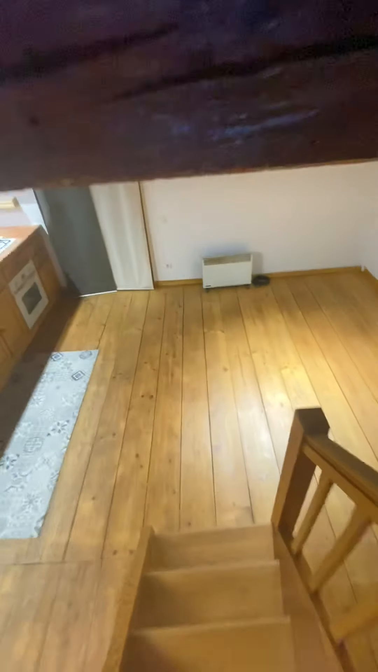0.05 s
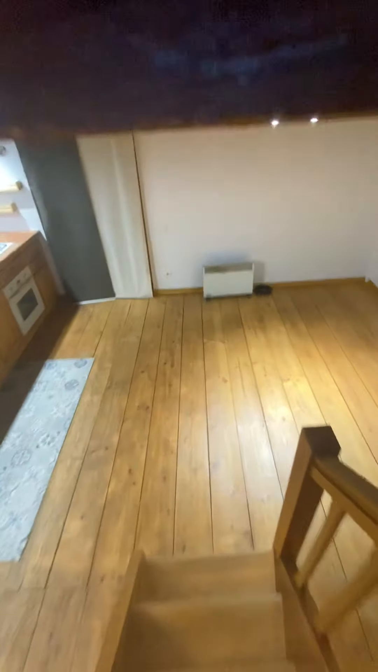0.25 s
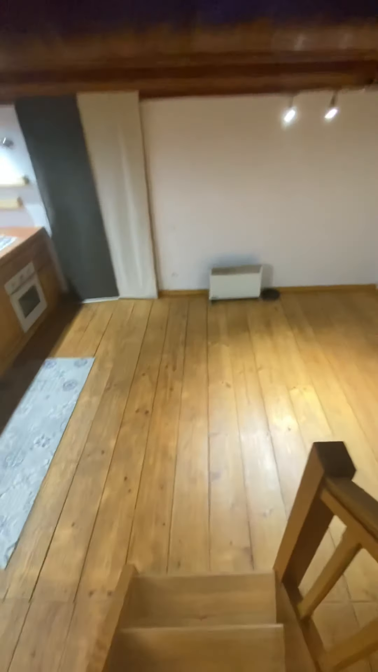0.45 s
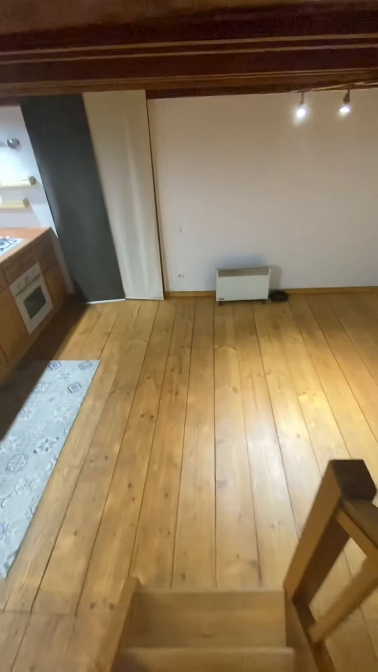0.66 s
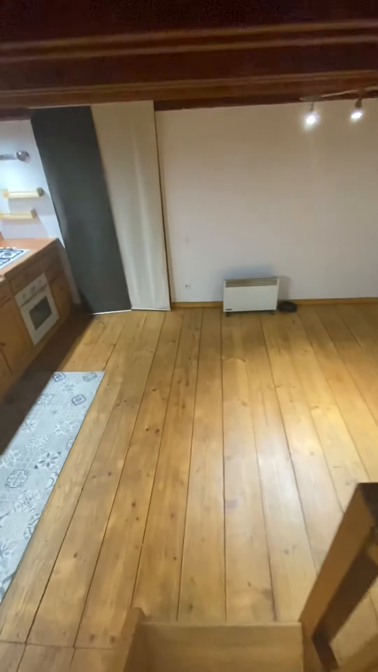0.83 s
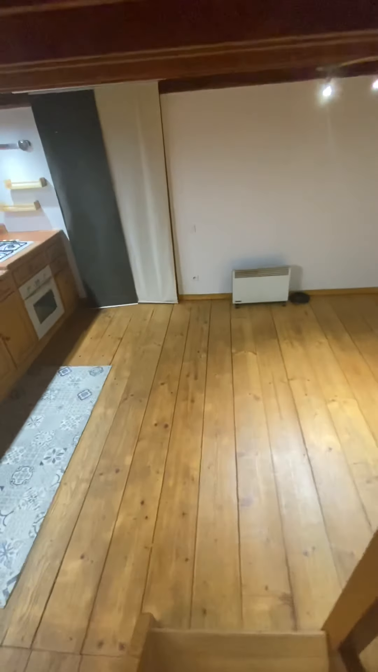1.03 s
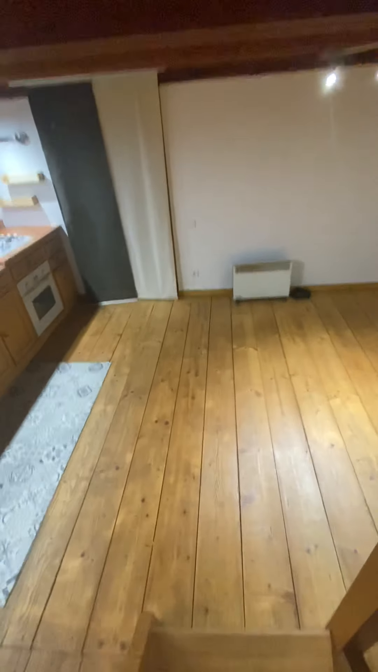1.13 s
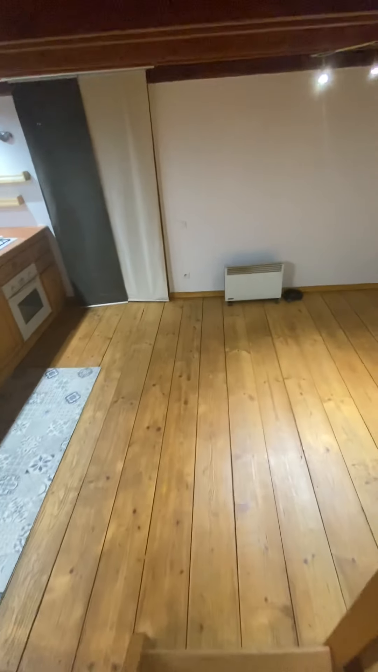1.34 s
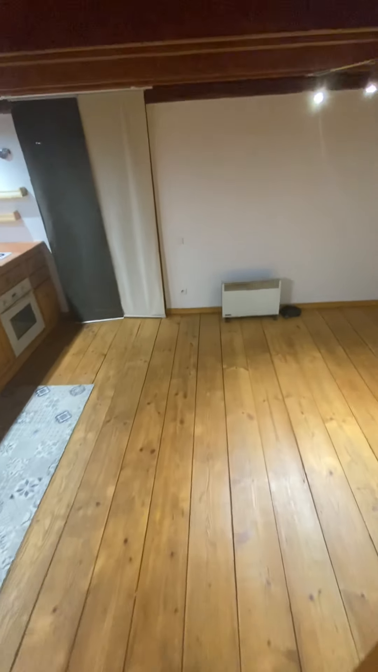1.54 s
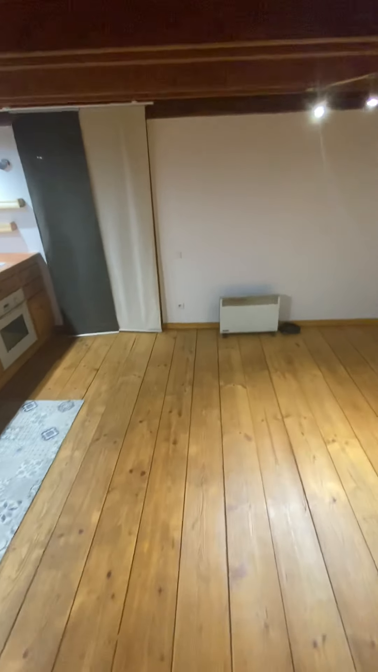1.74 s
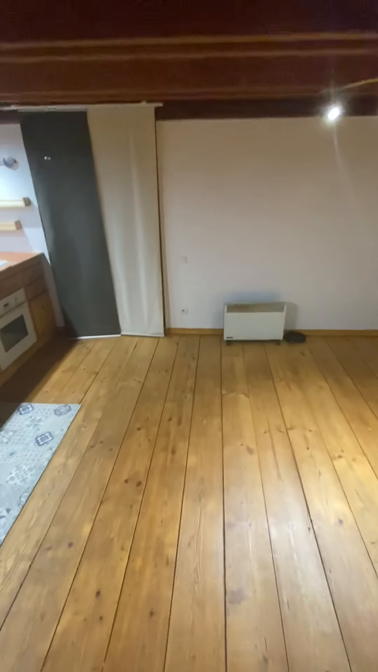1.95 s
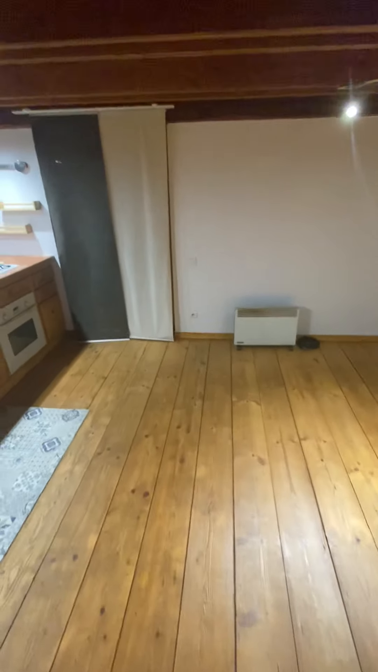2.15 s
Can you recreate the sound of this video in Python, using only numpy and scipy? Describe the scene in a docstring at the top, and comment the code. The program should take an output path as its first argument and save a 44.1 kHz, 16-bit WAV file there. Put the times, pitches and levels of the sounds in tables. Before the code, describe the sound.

Soft-soled footsteps come down a wooden staircase. A deep, hollow thud sounds at 0.2 seconds, with faint contacts and scuffs after it, then a fuller, knockier thud at 0.87 with a slight creak-like flex. At 1.63 a firm thump lands on the floorboards, followed by a faint settling touch. Clothes rustle lightly between steps; the bare room rings for under a second over quiet low hum.

```python
"""Soft footfalls come down the last two treads of a wooden staircase and onto the floorboards of a bare room.
Each sets the wood ringing: a few strong sine modes over a dense knock of noise bands that dies in the room.
The sole scuffs in short noise bursts, and the structure flexes in brief low sine swings under the weight.
Clothes rustle as flickering noise that swells with each stride; the room hums faintly as steady noise.
A stereo pair hears it all, slightly earlier on the right."""
import sys
import numpy as np
from scipy import signal
from scipy.fft import rfft, irfft, next_fast_len
from scipy.io import wavfile

SR = 44100
rng = np.random.default_rng(int(sys.argv[2]) if len(sys.argv) > 2 else 0)


def materialize(psi):
    """Save the field psi as 16-bit PCM at rate SR to the path in sys.argv[1].

    A 1-D psi becomes a single channel; in a 2-D psi each row is a channel.
    """
    bounded = np.clip(np.atleast_2d(psi).T, -1, 1)
    quanta = np.round(bounded * 32767).astype(np.int16)
    wavfile.write(sys.argv[1], SR, quanta)


N = 97020
T = np.arange(N) / SR
BAND_EDGES_HZ = 25 * 2 ** (np.arange(29) / 3)   # third octaves
CENTRES_HZ = np.sqrt(BAND_EDGES_HZ[1:] * BAND_EDGES_HZ[:-1])

# room hum spectrum: pitch_hz, relative level per hertz [dB]
HUM_SPECTRUM = [(25, -15), (45, 0), (68, -20), (98, 12.5), (140, -32), (200, -38), (500, -28.5),
                (2000, -31), (6000, -63)]
# time the room takes to die away: pitch_hz, t60_s
ROOM_T60 = [(60, 1), (125, 0.71), (250, 0.73), (550, 0.67), (800, 0.77), (3000, 1)]
# correlation of the left and right noise: pitch_hz, likeness [-1 opposite to 1 identical]
STEREO_LIKENESS = [(150, 0.97), (300, 0.91), (550, -0.32), (2000, 0.4), (5000, 0.39)]
# swells of the clothes: time_s, relative level_db
RUSTLE_SWELLS = [(0.0, -64), (0.26, -58.5), (0.54, -66.5), (0.8, -61.5), (0.87, -57.5), (1.0, -58.5),
                 (1.18, -67), (1.59, -59), (1.75, -58.5), (1.8, -65), (1.96, -64), (2.02, -69),
                 (2.2, -72.5)]
# cloth spectrum: pitch_hz, relative level per hertz [dB]
RUSTLE_SPECTRUM = [(500, -6), (1200, -15.5), (2300, -2.5), (3300, -5.5), (4400, -1), (5800, -1),
                   (6800, -4.5), (11300, -9.5), (13000, -10.5), (15500, -20.5)]
# wood flexing as the weight settles: start_s, level_db, pitch_hz, length_s
FLEXES = [(0.243, -51, 127, 0.025), (0.435, -48.5, 114, 0.074), (0.671, -45, 93.4, 0.14),
          (.867, -30.5, 131.5, 0.035), (0.924, -38.5, 48, 0.081), (0.926, -45, 84.8, 0.19),
          (1.811, -36.5, 96, 0.055)]
# sole touching and sliding on the wood: start_s, level_db, centre_hz, rise_s, t60_s
SCUFFS = [(0.201, -41, 2340, 0.001, 0.027), (0.201, -29, 480, 0.0034, 0.082),
          (.375, -43.5, 440, 0.0092, 0.13), (0.424, -44.5, 432, .015, 0.11),
          (0.668, -43, 550, 0.0031, 0.11), (0.668, -55.5, 2100, 0.0013, 0.11),
          (0.865, -45, 2320, 0.0018, 0.16), (.874, -44.5, 2700, .002, 0.069), (.872, -46, 1600, 0.016, .4),
          (1.539, -58, 390, 0.027, 1), (2.133, -61.5, 408, 0.0075, 0.76)]
# footfalls: start_s, relative ring_db, relative knock_db, rise_s, surface [name]
FOOTFALLS = [(.203, -22.5, -22.5, 0.0013, "upper"), (0.371, -64, -47.5, 0.0028, "upper"),
             (0.669, -49.5, -37.5, 0.005, "upper"), (.867, -28.5, -20, 0.0088, "lower"),
             (1.626, -24.5, -20.5, 0.0049, "floor"), (1.830, -54, -45.5, 0.008, "floor")]
# strong modes of each surface, by name: pitch_hz, relative level_db, t60_s
SURFACE_MODES = { "upper": [(123.2, 0, 0.58), (164.6, -6, 0.52), (243, -12.5, 0.395), (415.5, -13, 0.4),
                 (508, -4.5, 0.12), (648, -10.5, 0.32), (940, -15, 0.23), (1037, -25.5, 0.41)],
                 "lower": [(128, 4, 0.073), (202, -6.5, 0.49), (281, -1.5, 0.26), (354, -13.5, 0.77),
                 (447, -2, 0.54), (602, -3.5, 0.4), (652, -9, 0.43), (770, -9, 0.77), (838, -14.5, 0.57),
                 (1060, -8, 0.44), (1210, -14, 0.73), (1630, -23, 0.32)], "floor": [(107.2, -9, 0.65),
                 (154, -14.5, 0.93), (231.5, 6.5, 0.082), (552, -4, 0.38), (581.4, 10, 0.083),
                 (647, -14.5, 0.86), (665, -10, 0.39), (731, -4, 0.37), (767, -8.5, 0.48), (845, -3.5, 0.1),
                 (1052, -11, 0.42), (1187, -11, 0.45), (1320, -21, 0.37)]}
# dense knock of each surface, by name: pitch_hz, relative level per hertz [dB]
KNOCK_SPECTRA = { "upper": [(30, -15), (70, -4.5), (125, 3), (240, -11), (520, -8.5), (750, -22),
                 (1000, -20), (1250, -32), (2000, -31.5), (2800, -33), (4000, -57)], "lower": [(30, -25),
                 (70, -3.5), (125, 2), (240, 1.5), (430, 2.5), (530, -11.5), (800, 4.5), (950, -30),
                 (1150, -14.5), (1400, -24), (2000, -23.5), (2800, -28.5), (4000, -59)],
                 "floor": [(30, -25), (70, -10.5), (125, -1.5), (240, -8), (450, -6.5), (600, -1.5),
                 (820, -14), (1000, -16.5), (1300, -22), (1900, -32), (2800, -32.5), (4000, -61)]}

HUM_DB = -58.5
RUSTLE_OFFSET_DB, RUSTLE_FLICKER_DB, FLICKER_PER_S = 3.5, 1.31, 55
SCUFF_DB_PER_OCTAVE2 = 49   # how fast a scuff falls away from its centre
RIPPLE_DB, RIPPLE_SPACING_HZ = 2.5, 14   # close resonances of the wood
LINGER_DB, LINGER_T60_S = -53, 1   # the stairs still ring from the step before
MODE_RISE_S = 0.012
MODE_SPREAD_RAD_PER_KHZ = 0.42   # mean phase gap between left and right
BEAT_CYCLES, BEAT_DEPTH_PER_KHZ = 20, .7   # close neighbours beat against a mode, more in the treble
EARLY_DB, EARLY_T60_S = 4, 0.045   # near part of the knock, relative to the room's tail
BASS_RISE_CYCLES = 1.9   # low notes take longer to build
TAIL_RISE_S = 0.032   # the room answers a little later
TAIL_FLICKER_DB, TAIL_FLICKER_PER_S = 2, 60   # the knock's tail flickers unevenly as it dies
LEFT_LAG_S, PAN_DB = 0.0001933, 0.5   # left later; left raised and right lowered by PAN_DB
LOW_CUT_HZ, CUTOFF_HZ = 30, 15900


def from_db(db):
    """Decibels to gain."""
    return 10 ** (np.asarray(db) / 20)


def at_hz(points, hz):
    """Read a table on a log-frequency axis."""
    table_hz, values = np.transpose(points)
    return np.interp(np.log(hz), np.log(table_hz), values)


def decay(t, t60):
    """Exponential fall, 60 dB in t60."""
    return np.exp(-np.log(1000) * t / t60)


def rise(t, length):
    """Smooth onset."""
    return np.sin(np.pi / 2 * np.clip(t / length, 0, 1)) ** 2


def wander(t, per_s):
    """Random curve with a new value per_s times a second."""
    knots = np.arange(0, N / SR + 1, 1 / per_s)
    return np.interp(t, knots, rng.standard_normal(len(knots)))


def noise_bands(white):
    """Third-octave stereo noise, rms 1 each: left and right alike in the bass, less so or opposed above."""
    bands = []
    for k, hz in enumerate(CENTRES_HZ):
        band_pass = signal.butter(2, BAND_EDGES_HZ[k:k + 2], "band", fs=SR, output="sos")
        # neighbouring bands use separate noise
        mid, side = signal.sosfilt(band_pass, white[k % 2])[:, -N:]
        alike = np.clip(at_hz(STEREO_LIKENESS, hz), -.99, .99)
        band = np.sqrt(1 + alike) * mid + np.sqrt(1 - alike) * side * [[1], [-1]]
        bands.append(band / band.std())
    return np.array(bands)


def band_gains(spectrum):
    """Gain of each band for a spectrum per Hz; total power 1."""
    gains = from_db(at_hz(spectrum, CENTRES_HZ)) * np.sqrt(CENTRES_HZ)
    return gains / np.linalg.norm(gains)


def coloured(spectrum, bands):
    """Mix the bands to a spectrum."""
    return np.tensordot(band_gains(spectrum), bands, 1)


def resonant(white):
    """Uneven peaks and dips in the noise spectrum, as from many close resonances."""
    hz = np.fft.rfftfreq(white.shape[-1], 1 / SR)
    knots = np.arange(0, SR / 2, RIPPLE_SPACING_HZ)
    ripple = np.interp(hz, knots, rng.standard_normal(len(knots)))
    depth_db = RIPPLE_DB * np.clip(ripple, -2, 2)
    return irfft(rfft(white) * from_db(depth_db), white.shape[-1])


def room_hum(bands):
    """The room's faint steady noise, strongest in the bass."""
    return from_db(HUM_DB) * coloured(HUM_SPECTRUM, bands)


def clothes(bands):
    """Cloth slides on cloth, swelling with each stride, with a fine uneven grain."""
    grain_db = RUSTLE_FLICKER_DB * wander(T, FLICKER_PER_S)
    swell_db = np.interp(T, *np.transpose(RUSTLE_SWELLS))
    return from_db(RUSTLE_OFFSET_DB + swell_db + grain_db) * coloured(RUSTLE_SPECTRUM, bands)


def flexing():
    """Brief low swings of the structure under the walker's weight, alike on both sides."""
    out = np.zeros(N)
    for start_s, level_db, hz, length_s in FLEXES:
        t = T - start_s
        swell = np.sin(np.pi * np.clip(t / length_s, 0, 1)) ** 2
        out += from_db(level_db) * swell * np.sin(2 * np.pi * hz * t)
    return out


def scuffs(bands):
    """Dry rubs of the sole: noise around one centre pitch that rises and dies away."""
    out = np.zeros((2, N))
    for start_s, level_db, centre_hz, rise_s, t60_s in SCUFFS:
        t = np.maximum(T - start_s, 0)
        octaves = np.log2(CENTRES_HZ / centre_hz)
        spectrum = np.column_stack([CENTRES_HZ, -SCUFF_DB_PER_OCTAVE2 * octaves ** 2])
        out += from_db(level_db) * rise(t, rise_s) * decay(t, t60_s) * coloured(spectrum, bands)
    return out


def ring(modes, t):
    """Strong modes of a board, each a beating cluster; the left-right phase gap tends to grow with pitch."""
    out = 0
    for k, (hz, level_db, t60_s) in enumerate(modes):
        khz = hz / 10 ** 3
        gap = MODE_SPREAD_RAD_PER_KHZ * khz * (1 + .5 * rng.standard_normal())
        phase = gap * np.array([[-.5], [.5]])
        # random complex values make the mode's strength and phase drift
        neighbours = rng.standard_normal(size=512) * np.exp(2j * np.pi * rng.random(size=512))
        drift = np.interp(t * hz / BEAT_CYCLES, np.arange(len(neighbours)), neighbours)
        depth = BEAT_DEPTH_PER_KHZ * khz
        beats = (1 + depth * drift) / np.hypot(1, depth / 2)
        tone = np.imag(beats * np.exp(1j * (2 * np.pi * hz * t + phase)))
        out = out + (-1) ** k * from_db(level_db) * decay(t, t60_s) * tone
    return out * rise(t, MODE_RISE_S)


def knock(spectrum, rise_s, t, bands):
    """Countless weak modes of wood and room: a quick early fall, then a tail that flickers band by band."""
    out = 0
    early = from_db(EARLY_DB) * decay(t, EARLY_T60_S)
    for hz, gain, band in zip(CENTRES_HZ, band_gains(spectrum), bands):
        if hz < spectrum[-1][0]:
            flicker = from_db(TAIL_FLICKER_DB * wander(t, TAIL_FLICKER_PER_S))
            tail = rise(t, TAIL_RISE_S) * decay(t, at_hz(ROOM_T60, hz)) * flicker
            onset = rise(t, rise_s + BASS_RISE_CYCLES / hz)
            out = out + gain * onset * (early + tail) * band[:, -len(t):]
    return out / 2


def footsteps(bands):
    """Every footfall rings and knocks the surface it lands on, over the dying ring of the stairs."""
    out = from_db(LINGER_DB) * decay(T, LINGER_T60_S) * coloured(KNOCK_SPECTRA["upper"], bands)
    for start_s, ring_db, knock_db, rise_s, surface in FOOTFALLS:
        start = int(start_s * SR)
        t = T[:N - start]
        out[:, start:] += from_db(ring_db) * ring(SURFACE_MODES[surface], t)
        out[:, start:] += from_db(knock_db) * knock(KNOCK_SPECTRA[surface], rise_s, t, bands)
    return out


def scene():
    """Steps and clothes over the room's low hum, heard slightly earlier on the right."""
    # axes: air or wood, alternating bands, mid or side, samples
    white = rng.standard_normal((2, 2, 2, next_fast_len(N + SR // 2)))
    air = noise_bands(white[0])
    wood = noise_bands(resonant(white[1]))
    left, right = room_hum(air) + clothes(air) + flexing() + scuffs(wood) + footsteps(wood)
    left = np.interp(T - LEFT_LAG_S, T, left)
    return np.array([from_db(PAN_DB) * left, from_db(-PAN_DB) * right])


def record(dry):
    """The deepest bass is lost and the top is cut steeply."""
    low_cut = signal.butter(4, LOW_CUT_HZ, "high", fs=SR, output="sos")
    top_cut = signal.ellip(10, .1, 80, CUTOFF_HZ, fs=SR, output="sos")
    return signal.sosfilt(top_cut, signal.sosfilt(low_cut, dry))


dry = scene()
out = record(dry)
materialize(out)
```